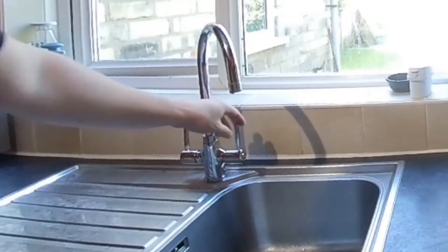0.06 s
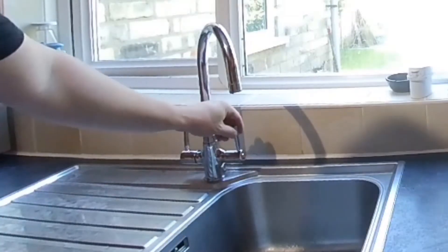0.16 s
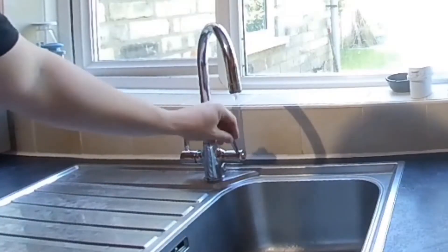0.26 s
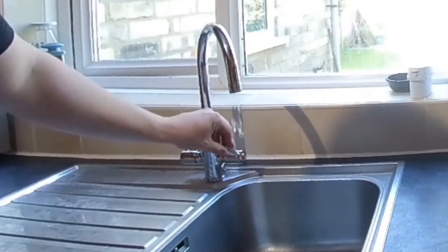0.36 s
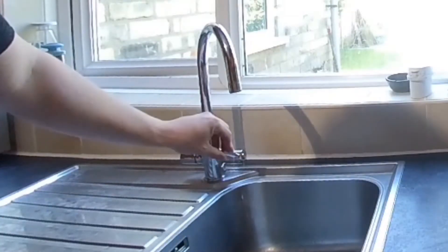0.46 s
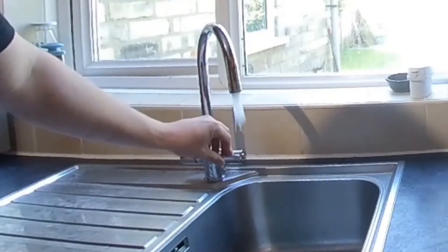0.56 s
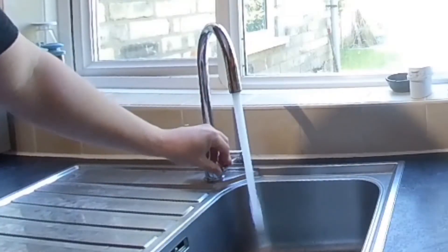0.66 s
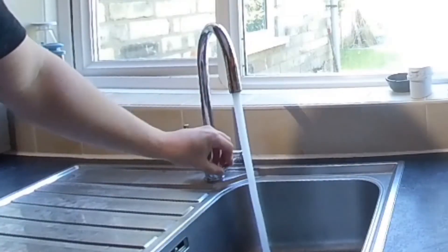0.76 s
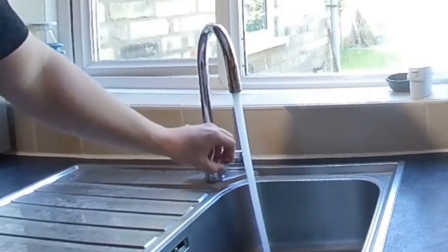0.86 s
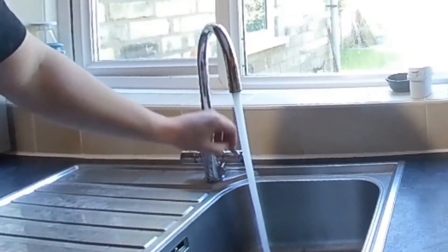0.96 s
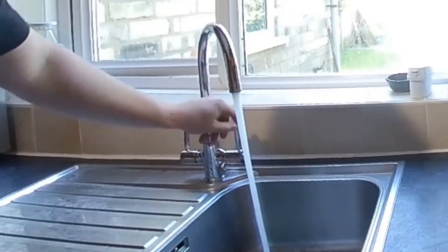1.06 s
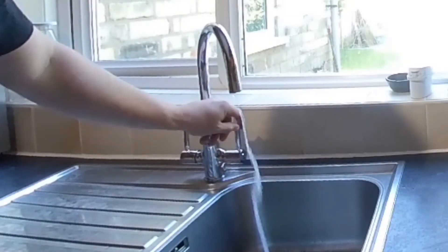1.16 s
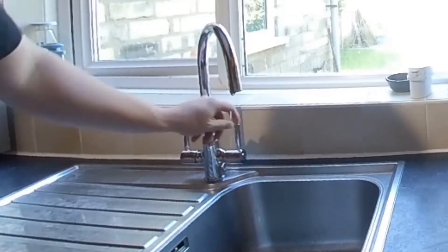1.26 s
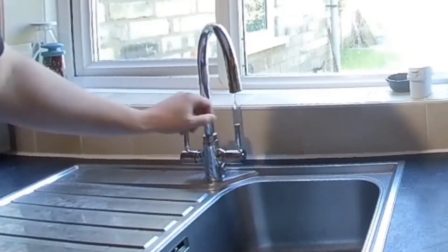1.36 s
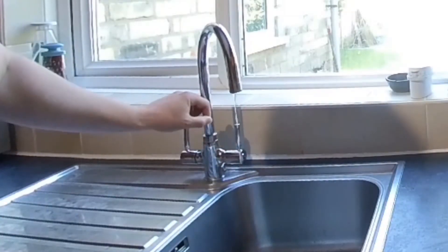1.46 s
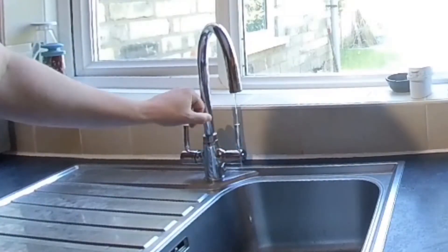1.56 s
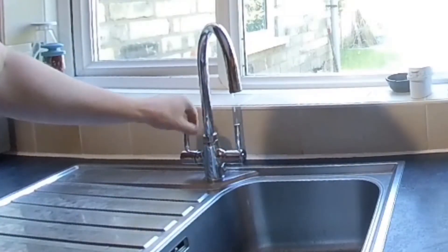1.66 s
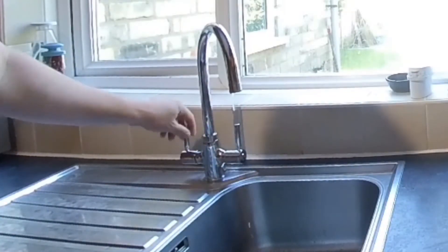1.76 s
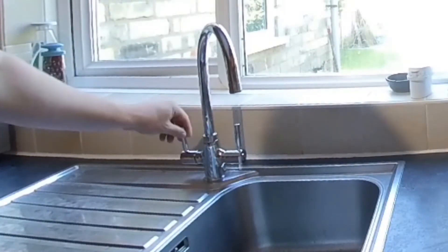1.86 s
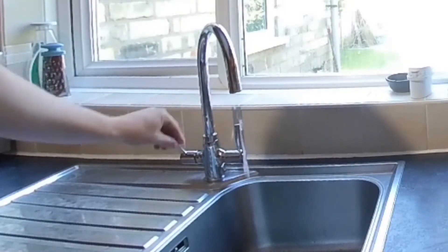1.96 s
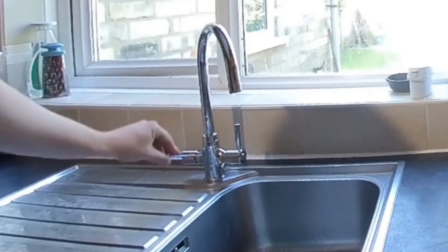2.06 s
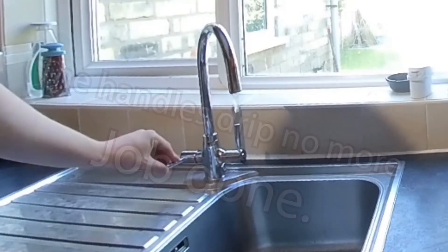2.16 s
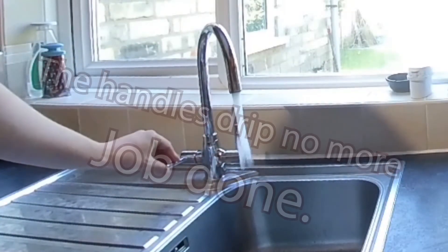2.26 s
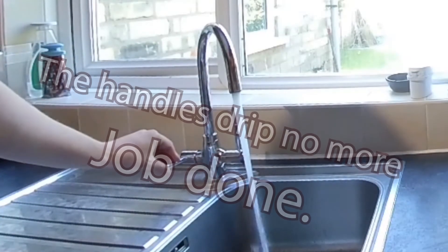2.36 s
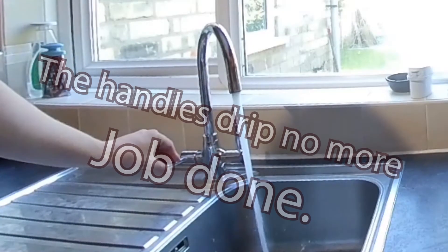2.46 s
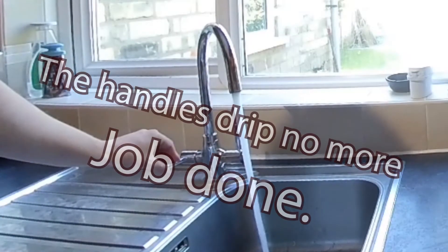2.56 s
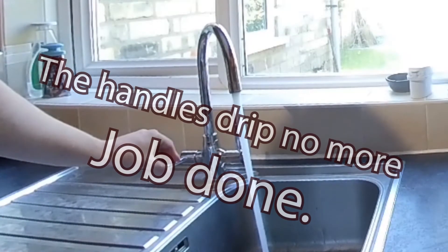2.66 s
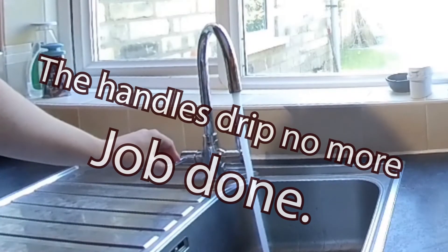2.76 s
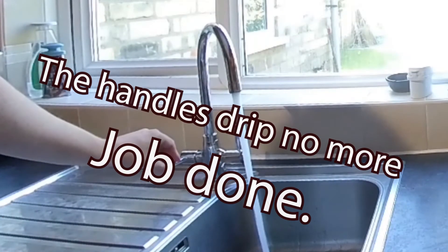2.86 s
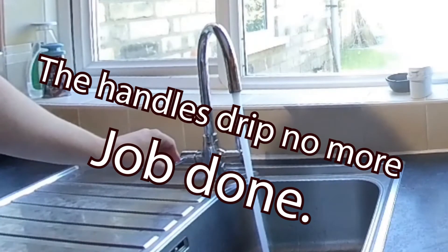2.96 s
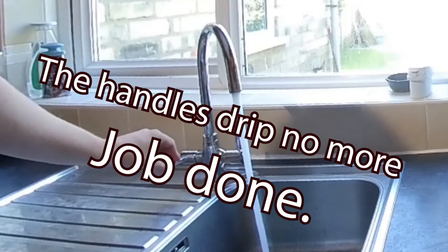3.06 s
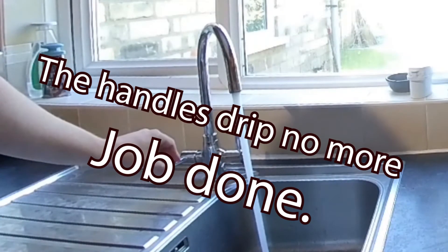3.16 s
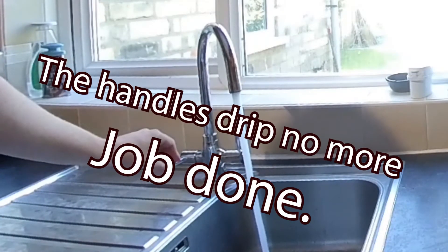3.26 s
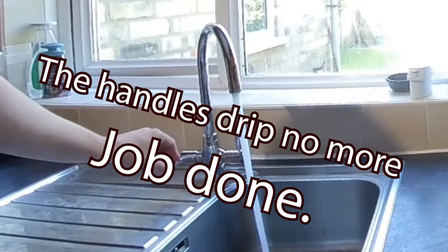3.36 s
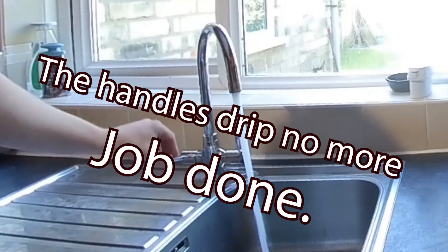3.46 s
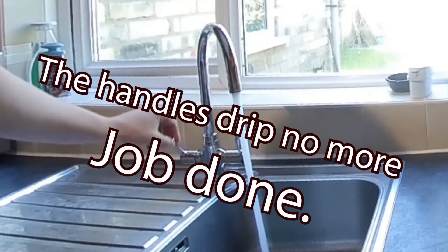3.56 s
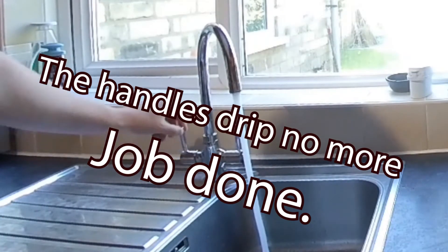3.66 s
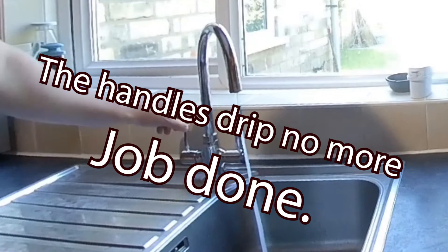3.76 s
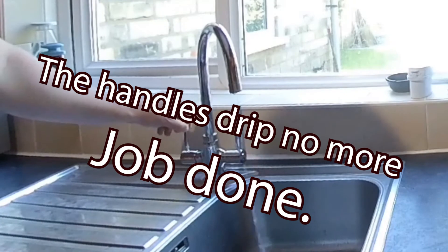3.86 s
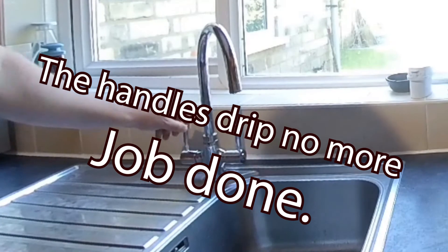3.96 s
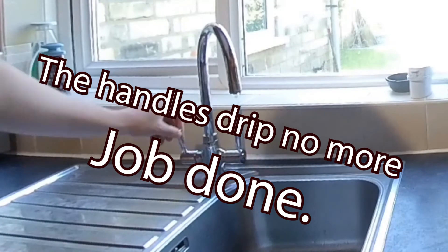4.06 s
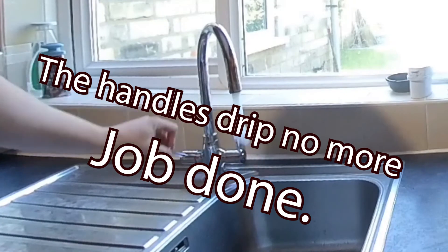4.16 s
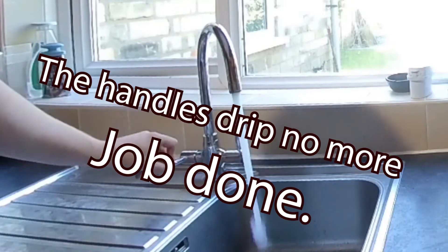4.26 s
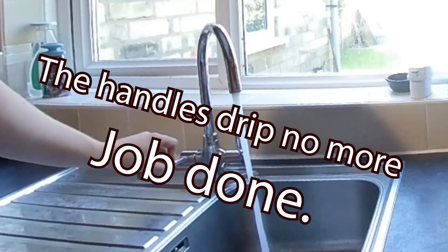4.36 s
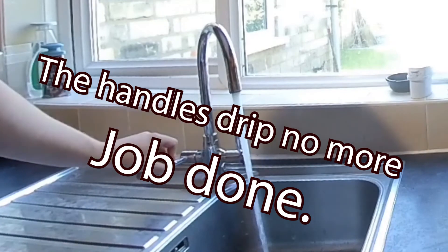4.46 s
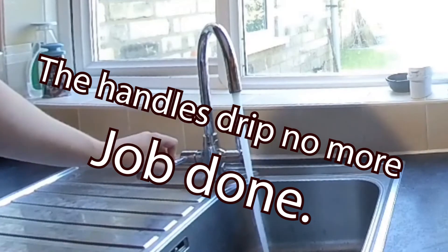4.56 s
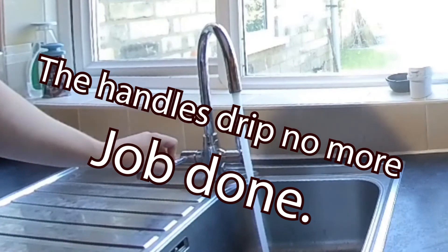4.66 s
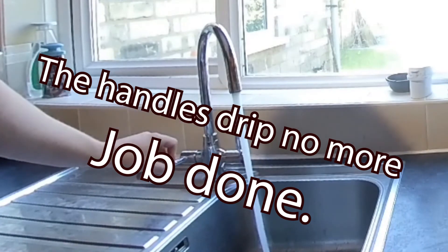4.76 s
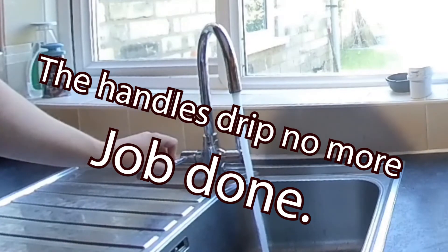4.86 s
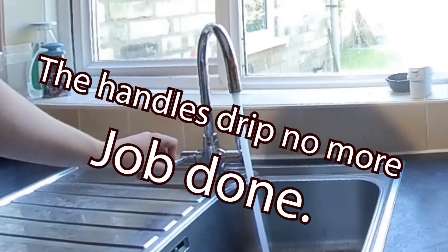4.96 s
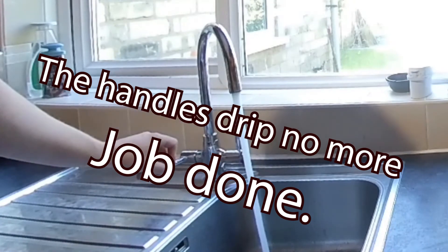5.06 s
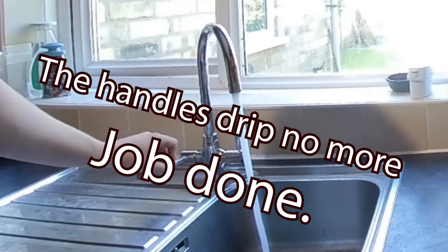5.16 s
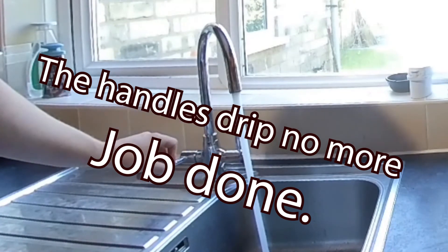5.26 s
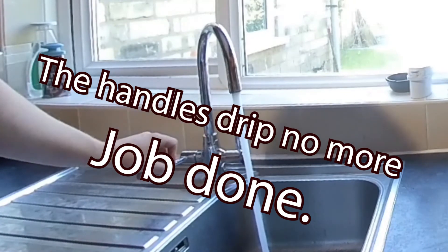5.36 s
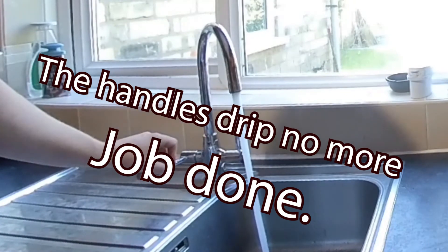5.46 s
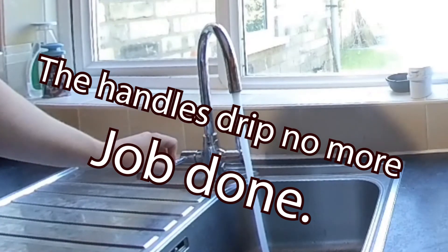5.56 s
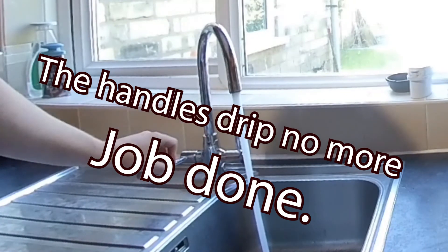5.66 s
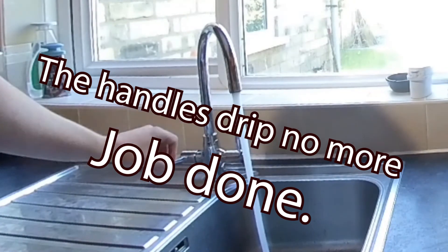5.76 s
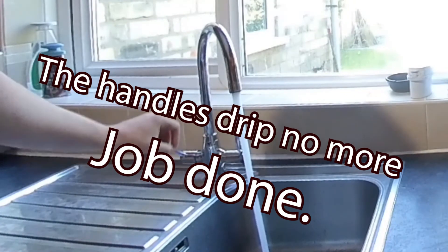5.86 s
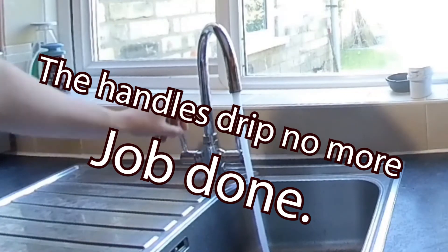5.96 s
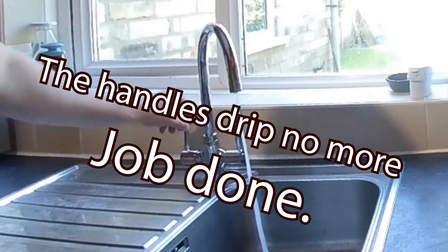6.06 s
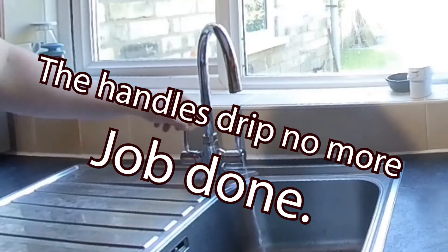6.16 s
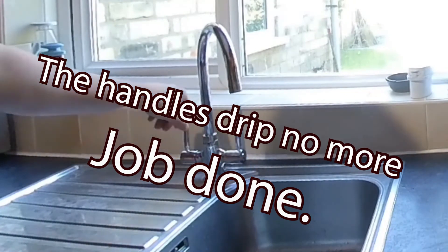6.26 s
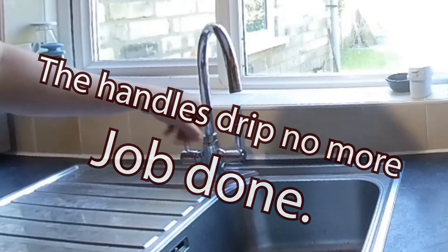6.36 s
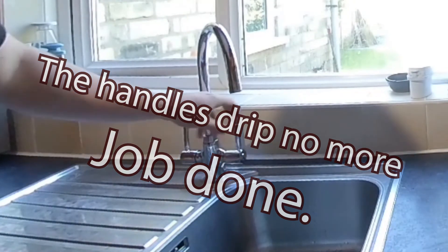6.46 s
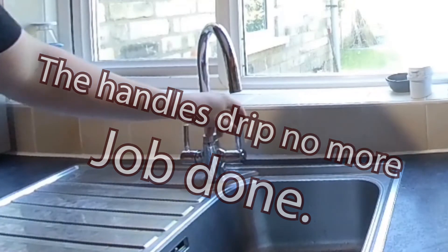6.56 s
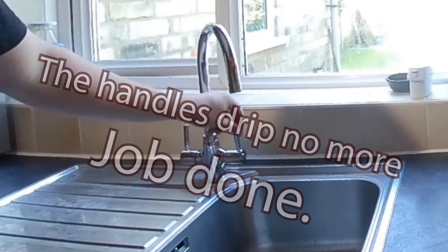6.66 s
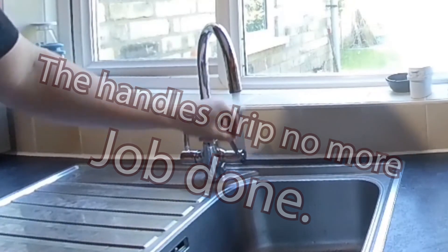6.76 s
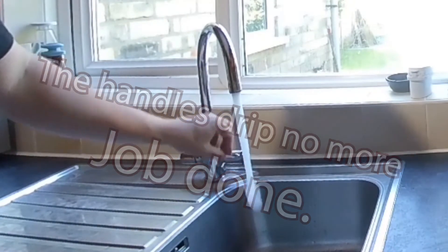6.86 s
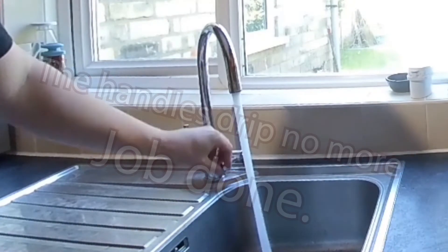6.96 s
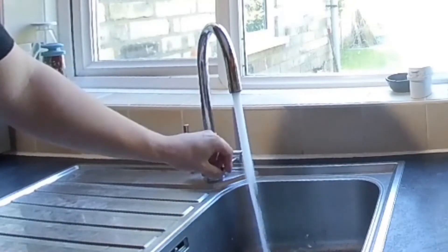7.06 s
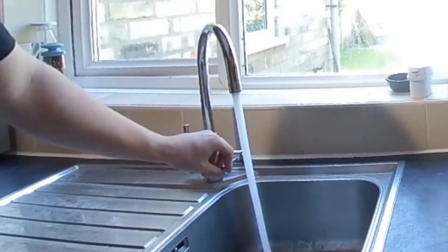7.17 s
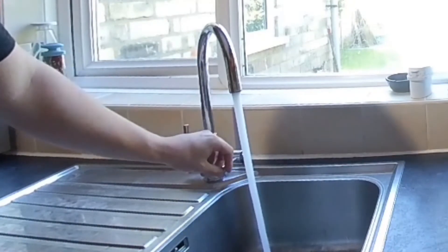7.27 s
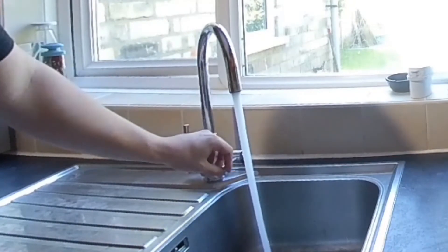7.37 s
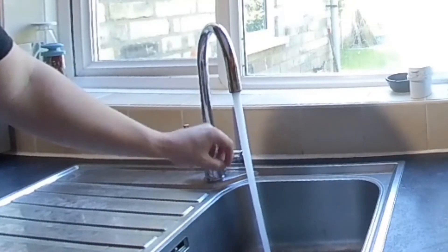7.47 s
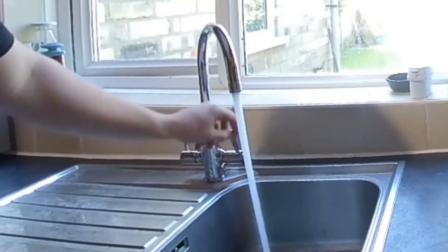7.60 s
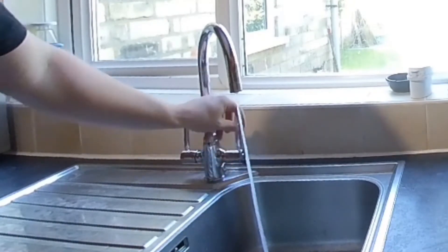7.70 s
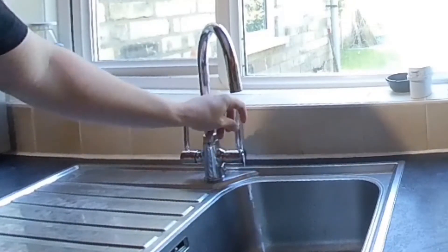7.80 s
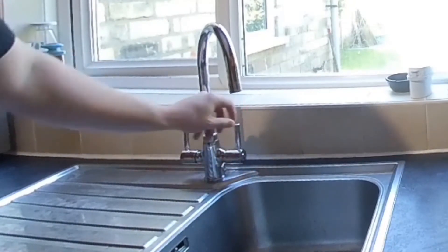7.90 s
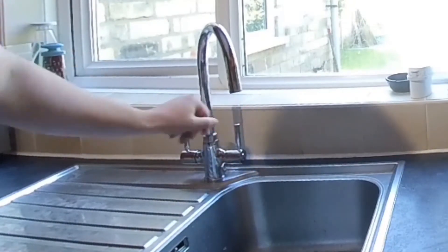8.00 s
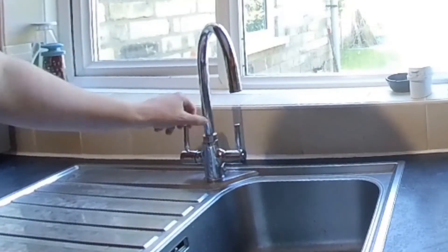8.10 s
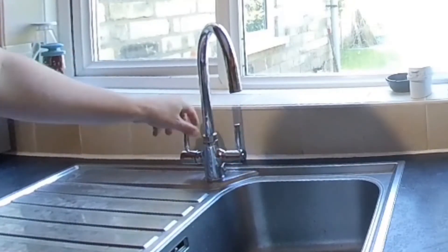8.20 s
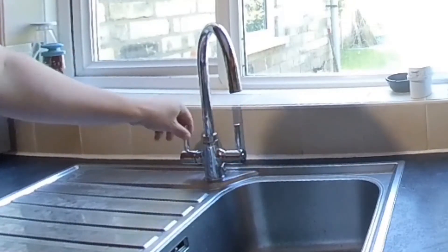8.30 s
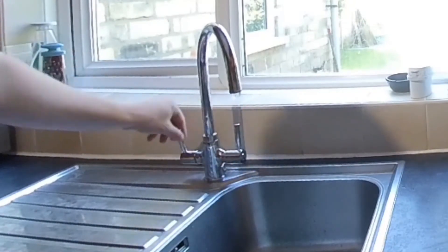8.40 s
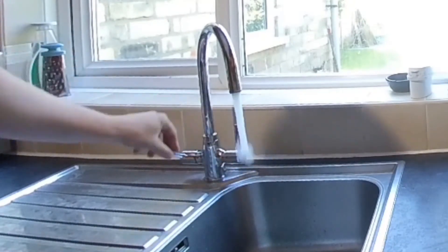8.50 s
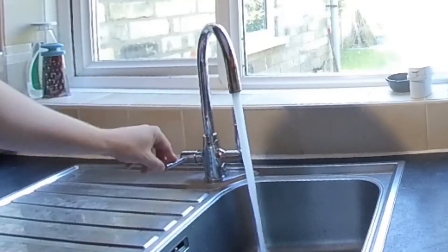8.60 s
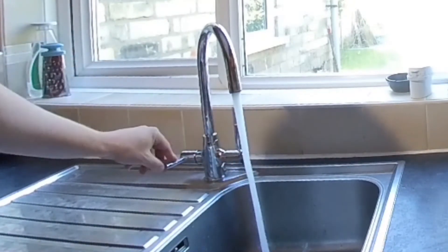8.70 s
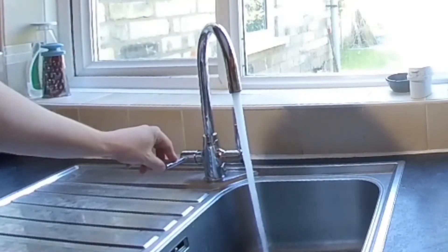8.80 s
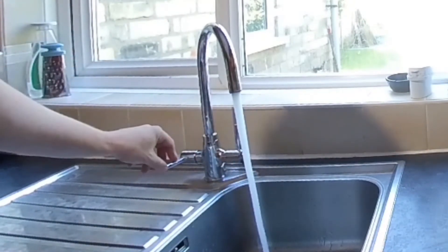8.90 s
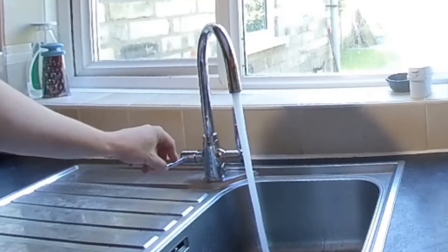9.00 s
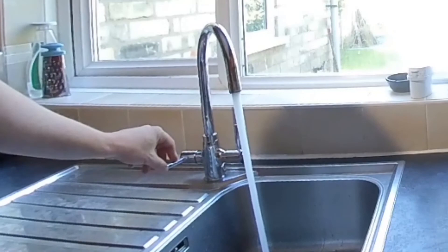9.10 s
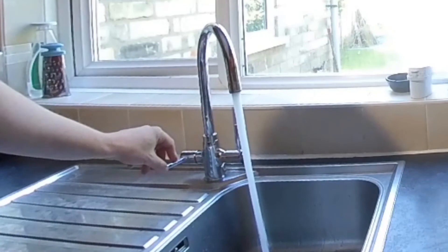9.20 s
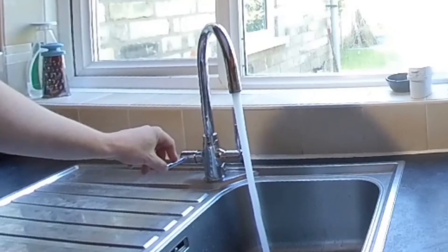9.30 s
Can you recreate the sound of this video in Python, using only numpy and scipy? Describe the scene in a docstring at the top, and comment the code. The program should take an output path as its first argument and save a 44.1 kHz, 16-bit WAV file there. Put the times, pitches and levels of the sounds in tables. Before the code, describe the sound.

Close by in a quiet, slightly ringing kitchen, a tap lever knocks dully, the spout spits, and a jet of water splashes into a steel basin with a bright hiss and a faint low rumble. It is shut off and reopened four times, leaving drips and small spatters in each gap. The drain gurgles briefly after the third run, and the water is still running at the end.

```python
"""Water hisses and drums into a steel kitchen sink, stopped and started by the levers of a mixer tap.
The barely open valve and the fine spray hiss, trapped air fizzes, and the jet rings the basin's modes
and rumbles in the cupboard below. The spout spits, slugs of water slap the steel, levers knock,
drips plink as they trap bubbles, the drain gurgles once, and the tiled kitchen rings briefly."""
import sys
import numpy as np
from scipy import signal
from scipy.fft import rfft, irfft, next_fast_len
from scipy.io import wavfile
from scipy.ndimage import uniform_filter1d

SR = 44100
rng = np.random.default_rng(int(sys.argv[2]) if len(sys.argv) > 2 else 0)


def log_audio(samples):
    """Write samples as a 16-bit WAV file to the path given in sys.argv[1]."""
    # one column per channel
    frames = np.atleast_2d(samples).T
    # limit to full scale, then quantise
    limited = np.clip(frames, -1, 1)
    pcm = np.round(limited * 32767).astype(np.int16)
    wavfile.write(sys.argv[1], SR, pcm)


N = 411894
N_FFT = next_fast_len(N + SR)
TIME_S = np.arange(N) / SR
FREQ_HZ = np.maximum(np.arange(N_FFT // 2 + 1) * SR / N_FFT, 1)

# room tone spectrum: freq_hz, density_db
ROOM_SPECTRUM = [(18, -60), (30, -16), (81, -10.5), (292, -18), (333, -12), (400, -14.5), (711, -21),
                 (770, -9.5), (832, -14), (1830, -25), (15600, -32)]
# drips at the drain: start_s, level_db, pitch_hz
DRAIN_DRIPS = [(0.362, -43, 1403), (0.422, -41, 850), (0.525, -42, 620), (0.548, -41.5, 480),
               (1.944, -38, 522), (0.722, -22, 3600), (0.735, -30, 3000), (0.738, -29, 4520),
               (4.454, -22, 1774), (4.461, -22, 3000), (1.426, -33, 2900), (1.44, -38, 1420),
               (1.475, -47, 1440), (1.502, -39, 2750), (1.613, -44, 1600), (6.518, -45, 1135),
               (6.681, -46, 1070), (6.766, -43, 1110), (6.89, -37, 2180), (6.905, -38, 3250),
               (6.931, -37, 1420), (8.03, -45, 1400), (8.18, -44.5, 1610), (8.292, -50, 438),
               (8.575, -40, 1710), (2.03, -43, 1630), (2.078, -27, 1360), (2.333, -26.5, 1386),
               (6.695, -45, 2310), (6.748, -45, 2330), (6.812, -35.5, 1560), (8.28, -51, 1650),
               (1.584, -41, 883), (1.614, -33, 1005), (1.647, -39, 1030), (1.717, -44, 1075),
               (1.74, -41, 600), (4.219, -41, 1035), (2.718, -23, 4750), (4.769, -30, 1085),
               (4.814, -28, 1070), (6.469, -37, 1960), (6.537, -46, 1500), (6.592, -41, 1450),
               (6.622, -42, 2150), (6.829, -45, 594), (6.953, -35, 1390), (8.089, -44, 1560),
               (8.152, -45, 1517), (8.439, -46, 1690), (8.553, -36, 1370)]
# single drops on the steel: start_s, level_db, centre_hz, t60_s
STEEL_DROPS = [(0.359, -42, 3900, 0.06), (0.686, -20, 3500, 0.015), (1.708, -40, 2750, 0.1),
               (1.718, -42, 5200, 0.26), (1.775, -46, 7000, 0.12), (1.826, -46, 2940, 0.17),
               (3.878, -20, 7000, 0.015), (3.89, -17, 6500, 0.03), (3.931, -20, 6300, 0.02),
               (3.947, -22, 7000, 0.015), (3.986, -18, 7500, 0.04), (4.0, -20, 7800, 0.04),
               (4.03, -24, 7500, 0.015), (4.046, -28, 6500, 0.02), (4.075, -32, 6500, 0.02),
               (4.091, -28, 7300, 0.03), (4.645, -20, 6000, 0.02), (4.661, -17, 7500, 0.02),
               (6.258, -23, 10000, 0.02), (6.318, -25, 8500, 0.03), (6.331, -24, 10500, 0.05),
               (6.412, -16, 7250, 0.033), (6.42, -26, 7500, 0.2), (6.668, -44, 5000, 0.11),
               (7.949, -24, 8500, 0.02), (7.975, -22, 7000, 0.03), (7.995, -30, 9500, 0.02),
               (8.371, -44, 6200, 0.072)]
# levers reaching their stops: start_s, level_db, t60_s
LEVER_KNOCKS = [(0.422, -43, 0.25), (0.792, -31.5, 0.45), (1.236, -36, 0.11), (1.736, -40.5, 0.31),
                (1.941, -42, 0.11), (2.258, -24.5, 0.21), (2.279, -33, 0.16), (2.517, -34, 0.14),
                (3.879, -36, 0.21), (4.384, -27, 0.18), (4.398, -32, 0.23), (6.2, -37, 0.27),
                (6.808, -35.5, 0.14), (7.087, -40, 0.13), (7.839, -28.5, 0.12), (8.286, -48, 0.13),
                (8.711, -23.5, 0.24)]
# tap body modes: freq_hz, gain_db, t60_s
TAP_MODES = [(111, -16, 0.14), (186.4, -2, 0.13), (277, -3.5, 0.088), (446, -5.5, 0.086), (600, -9, 0.15)]
# valve hiss ahead of each jet: start_s, level_db
VALVE_HISSES = [(0.63, -41.5), (2.3, -42), (4.3, -44), (6.875, -43), (8.55, -46)]
# resonances of cupboard, spout tube and basin: freq_hz, width_hz, gain_db
CUPBOARD_MODES = [(85, 15, -4), (107, 18, -2.5), (138, 71, -10), (189, 28, 3), (223, 62, -7.5),
                  (271.4, 12, 5), (384, 21, -7.5), (446, 26, 1.5)]
SPOUT_MODES = [(6760, 270, 3), (8700, 350, 4), (10200, 500, -6), (12000, 600, -1)]
BASIN_MODES = [(600, 41.5, 1), (668, 12.6, 4.5), (812, 18, -5), (920, 88, 5), (1062, 136, -5.5),
               (1237, 58, 5), (1380, 48, 4.5), (1530, 72, 4.5), (1636, 61, -1), (1829, 50, 7),
               (2262, 30, 2.5), (2504, 60, 5.5), (2704, 28, -3.5), (2913, 31, 7.5), (3000, 41, -0.5),
               (3142, 110, 6), (3514, 54, 2.5), (3576, 107, 1.5)]
# spectra of fine spray and broad splash: freq_hz, density_db
SPRAY_SPECTRUM = [(2060, -22.5), (3500, -14), (4300, -6.5), (5260, -4), (7510, 1), (8670, -2), (11400, -1),
                  (12500, -0.5), (15100, 0), (15600, -0.5)]
SPLASH_SPECTRUM = [(250, -11.5), (500, 1.5), (1000, 2.5), (1700, 5.5), (2000, 6.5), (3000, 6), (4200, -1.5),
                   (6000, -5.5), (12000, -11.5)]
# spray bands that flicker separately: centre_hz
FLICKER_BANDS_HZ = [4000, 5600, 7800, 11000, 15000]
# air and water spat out: start_s, fizz_db, spray_db, splash_db, drum_db, t60_s, length_s, rise_s
SPOUT_SPURTS = [(0.616, -33, -57, -49, -34, 3, 0.07, 0.0051),
                (0.69, -35.5, -55, -45, -38, 1.6, 0.023, 0.011),
                (0.714, -26, -54, -37, -40, 2.3, 0.022, 0.0052),
                (1.994, -36.5, -45, -31, -29.5, 0.25, 0.026, 0.004),
                (2.025, -37, -44, -39, -38, 0.49, 0.07, 0.0065),
                (2.072, -51, -53, -45, -32, 0.3, 0.029, 0.0029),
                (2.203, -39.5, -43, -54, -38, 0.44, 0.055, 0.0048),
                (2.26, -45, -64, -41, -31.5, 0.43, 0.1, 0.0018),
                (2.354, -40, -50, -37.5, -64, 0.57, 0.22, 0.011),
                (4.441, -35, -55, -36, -46, 0.25, 0.015, 0.001),
                (6.37, -46, -55, -72, -54, 0.87, 0.11, 0.002)]
# slugs of water landing: start_s, level_db, spray_rel_db, splash_rel_db, drum_rel_db
SLUGS = [(0.3598, -46, -20, -7.5, 13), (0.42, -51.5, -5, -12, 13), (0.863, -28, -3, 1, 4),
         (0.878, -26, 2, 3, 1), (0.9398, -33, 4.5, 2, -19), (1.1337, -18, 6, -18, -23),
         (1.216, -27, -8, 11.5, -4), (1.229, -37, -8, -3, -11), (1.423, -24, 4, -25, -15),
         (1.439, -46, -10, -1, 18.5), (1.503, -36, -10, -13, -10), (1.706, -45, -12, 2, -3),
         (1.944, -58, -10, -5, 17), (2.005, -34, -26, 9, 14), (2.012, -39, -26, 4, 2),
         (2.076, -36, -20, 3, 18.5), (2.11, -38, -20, 2, 12), (2.309, -24, -22, -3, -1),
         (2.332, -31, -20, -1, -1), (2.367, -33, -24, 5, -7), (2.375, -29, -29, -2, -9),
         (2.518, -17.5, 4, 2, -5.5), (2.5387, -12, -18, 4, -32), (2.555, -16, -10, -1, -27),
         (2.587, -21, -3, -10, -31), (2.616, -26, 3, -12, -25), (2.635, -21.5, 9, -10, -27),
         (2.6725, -16, -15, -6, -26), (2.699, -20, -5, -12, -20), (2.725, -24, -9, -13, -22),
         (3.8895, -34, 7, -16, -2), (3.98, -32, -5, -13, -18), (4.087, -44, 5, -23, 11.5),
         (4.449, -27, -10, 4, -11), (4.46, -22, -20, -8, -24), (4.565, -27, -10, -12, -27),
         (4.645, -21, -6, -12, -30), (4.615, -17.5, -15, -5, -33), (4.662, -24.5, 5, -17, -28),
         (6.318, -32, 7, -21, -13), (6.3709, -30, -4, -22, -8), (6.412, -32, -8, -23, -6),
         (6.814, -45, -23, 11, 12), (6.8738, -46, -4, -3, -5), (7.0952, -25, -7, 8.5, -2),
         (7.289, -23.5, -9, 5, 3), (7.649, -18, -7, -15, -27), (7.718, -15, -2, -18, -23),
         (7.741, -19, -6, -16, -18), (8.1524, -47, -10, -13, 2), (8.282, -51, -2, -13, 13),
         (8.768, -22, 6, -1, -6), (8.941, -11, -8, -17, -32)]
# dribble from lever opening to jet landing, then the shut-off; blows are impacts on the basin:
# open_s, spray_from_db, spray_to_db, blows_from_db, blows_to_db, shut_s
LEVER_OPENINGS = [(0.41, -56, -41, -59, -38, 1.23), (2.0, -64, -48, -56, -42, 3.9),
                  (4.23, -47, -46, -49.5, -41, 6.32), (6.86, -54, -37, -50, -32.5, 7.72),
                  (8.552, -46, -60, -50, -37.5, 14)]
# one curve per jet, landing to last trickle: time_s, spray_db, blows_db
JET_CURVES = [
    [(0.862, -23, -29), (0.968, -21.5, -29), (1.2, -20.5, -25), (1.23, -22, -21.5), (1.358, -25.5, -36),
     (1.456, -35.5, -45), (1.55, -63, -57), (1.68, -61, -61.5), (1.95, -66, -63)],
    [(2.515, -32, -25.5), (2.55, -28, -34.5), (2.62, -28, -30.5), (2.74, -25, -34.5), (3.015, -26.5, -36),
     (3.77, -27, -38.5), (3.93, -30, -43.5), (4.0, -31, -45.5), (4.09, -38.5, -52.5), (4.16, -53, -56)],
    [(4.453, -33, -32), (4.483, -27, -33.5), (4.6, -25, -35), (4.63, -34, -38.5), (4.71, -24.5, -32),
     (4.8, -26.5, -35.5), (6.117, -27.5, -38.5), (6.22, -28.5, -41.5), (6.3, -35, -49.5), (6.44, -39, -55),
     (6.5, -48, -68), (6.59, -71, -54.5), (6.8, -81, -55.5)],
    [(7.08, -27, -22), (7.117, -26, -29.5), (7.145, -19.5, -17.5), (7.2, -20.5, -28.5), (7.27, -22.5, -30),
     (7.41, -23.5, -31), (7.55, -22, -29.5), (7.657, -19, -22.5), (7.837, -25.5, -35.5), (7.96, -33.5, -41),
     (8.065, -45, -56), (8.217, -77, -64.5), (8.5, -63, -57)],
    [(8.765, -31.5, -27.5), (8.81, -29.5, -38.5), (8.84, -24.5, -34), (8.93, -25.5, -36),
     (8.98, -26, -26.5), (9.04, -25.5, -35.5), (9.34, -26.5, -37)],
]
# splash, drumming and rumble against blows: level_at_steady_db, slope_db_per_db
BLOW_LAWS = [(-41.5, 0.7549), (-40, 0.6135), (-62, 0.9)]
# pipe shudder as each jet lands: level_db
LANDING_SHUDDER_DB = [-50, -53, -50.5, -52, -52]

ROOM_TONE_DB, ECHO_DB, ECHO_T60_S = -54.5, -11.5, 0.47
GURGLE_SPAN_S, GURGLE_SPAN_DB, GURGLE_HZ, GURGLE_BUBBLES = (6.55, 6.86), (-52, -43), 1083, 18
HUM_REL_DB, HUM_WIDTH_HZ = -11, 60
DRIP_T60_CYCLES = 165
THUD_REL_DB, PUSH_S = -4, 0.002
VALVE_LOW_HZ, VALVE_SWELL_DB_PER_S, TOP_HZ = 11500, 25, 15720
CREST_DB = 7  # peak over rms of a noise burst
SLAP_T60_S, SLAP_TOP_HZ, CLANG_REL_DB = 0.05, 9050, -8.5
LANDING_T60_S, SHUT_SHUDDER_DB, SHUT_T60_S = 3.4, -48.5, 1.55
IDLE_SPRAY_DB, IDLE_BLOWS_DB, STEADY_BLOWS_DB, JUMP_S = -65, -69, -36, 0.005
THINNING_S, THIN_SPLASH_DB = 0.075, -26
DULL_LAG_S, DULL_DB_PER_S, DULL_MAX_DB = 0.07, 45, 6  # dB per band above the middle one
SPIT_LOW_HZ = 840  # light spits stir the higher drumming notes


def undb(db):
    """Decibels to gain."""
    return 10 ** (np.asarray(db) / 20)


def unit(x):
    """Scale to rms 1."""
    return x / np.sqrt(np.mean(x ** 2))


def colour(points):
    """Gain over frequency through (freq_hz, gain_db) points."""
    hz, db = np.transpose(points)
    return undb(np.interp(np.log(FREQ_HZ), np.log(hz), db))


def ring(modes):
    """Causal response of a body's resonances, neighbours in opposite sign."""
    return sum((-1) ** k * undb(db) * 1j * FREQ_HZ * width / (hz ** 2 - FREQ_HZ ** 2 + 1j * FREQ_HZ * width)
               for k, (hz, width, db) in enumerate(modes))


def lowpass(hz, order):
    """Butterworth low-pass response."""
    return signal.freqs(*signal.butter(order, hz, "low", analog=True), FREQ_HZ)[1]


def highpass(hz, order):
    """Butterworth high-pass response."""
    return signal.freqs(*signal.butter(order, hz, "high", analog=True), FREQ_HZ)[1]


def through(x, response):
    """Filter by a frequency response."""
    return irfft(rfft(x, N_FFT) * response, N_FFT)[:N]


def excite(drive, envelope, response):
    """Shape the drive, then ring a body of unit power gain with it."""
    return through(unit(drive) * envelope, response / np.sqrt(np.mean(np.abs(response) ** 2)))


def walk(rate_hz):
    """Smoothed random steps, rms 1."""
    hold = int(SR / rate_hz)
    steps = np.repeat(rng.standard_normal(N // hold + 1), hold)
    return unit(uniform_filter1d(uniform_filter1d(steps, hold), hold)[:N])


def impulses(starts_s, levels_db):
    """One impulse at each start."""
    return np.bincount((starts_s * SR).astype(int), undb(levels_db), N)


def fades(starts_s, levels_db, t60s_s, rise_s):
    """Sum of envelopes that jump up and die away."""
    out = np.zeros(N)
    for start_s, db, t60_s in np.broadcast(starts_s, levels_db, t60s_s):
        i = int(start_s * SR)
        t = TIME_S[:min(int(t60_s * SR), N - i)]
        out[i:i + len(t)] += undb(db - 60 * t / t60_s) * (1 - np.exp(-t / rise_s))
    return out


def patter(rate_hz, spread_db, tail_s, depth):
    """Uneven droplet impacts over the blur of countless finer ones."""
    hits = (rng.random(N) < rate_hz / SR) * undb(spread_db * np.minimum(rng.exponential(size=N), 3))
    bursts = signal.lfilter([1], [1, -np.exp(-1 / (tail_s * SR))], hits)
    return rng.standard_normal(N) * (1 + depth * unit(bursts))


def bubbles(rate_hz, low_hz, high_hz, decay_cycles, spread_db, samples):
    """Bubbles ring as damped sines of random time, pitch and strength; rms 1."""
    when, pitch, strength = rng.random((int(rate_hz * N / SR), 3)).T
    hz, t = (low_hz * (high_hz / low_hz) ** pitch)[:, None], TIME_S[:samples]
    gain = undb(-spread_db * np.log(np.maximum(strength, .1)))[:, None]
    notes = gain * np.sin(2 * np.pi * hz * t) * np.exp(-t * hz / decay_cycles)
    index = (when * (N - samples)).astype(int)[:, None] + np.arange(samples)
    return unit(np.bincount(index.ravel(), notes.ravel(), N))


def room_tone():
    """Faint, dull noise of wavering level."""
    gain = undb(ROOM_TONE_DB + 2.1 * walk(5.5))
    return gain * unit(through(rng.standard_normal(N), colour(ROOM_SPECTRUM)))


def kitchen_echo(direct):
    """Dense tail off tiles and glass, duller than the direct sound."""
    t = TIME_S[:int(.8 * SR)]
    tail = rng.standard_normal(len(t)) * undb(-60 * t / ECHO_T60_S) * (t > .004)
    tail = signal.lfilter([1], [1, -.3], tail)
    return undb(ECHO_DB) * signal.fftconvolve(direct, tail / np.sqrt(np.sum(tail ** 2)))[:N]


def drain_hum():
    """The drain's air column sounds on between the gurgle's bubbles."""
    swell_db = np.interp(TIME_S, GURGLE_SPAN_S, GURGLE_SPAN_DB, left=-120, right=-120)
    envelope = uniform_filter1d(undb(swell_db + HUM_REL_DB + 3 * walk(30)), size=500)
    return envelope * unit(through(rng.standard_normal(N), ring([(GURGLE_HZ, HUM_WIDTH_HZ, 0)])))


def gurgle():
    """A swelling string of bubbles near one note: rows of start_s, level_db, pitch_hz."""
    late, weak, pitch = rng.random((GURGLE_BUBBLES, 3)).T
    progress = (np.arange(GURGLE_BUBBLES) + late) / GURGLE_BUBBLES
    starts_s = np.interp(progress, (0, 1), GURGLE_SPAN_S)
    levels_db = np.interp(progress, (0, 1), GURGLE_SPAN_DB) - 6 * weak
    return np.transpose([starts_s, levels_db, GURGLE_HZ * (1 + .05 * (pitch - .5))])


def drips():
    """Bubbles trapped by drips and the gurgle; each note rises a little and wobbles as it dies."""
    out = np.zeros(N)
    events = np.concatenate([DRAIN_DRIPS, gurgle()])
    for (start_s, db, hz), (phase, beat) in zip(events, rng.random((len(events), 2))):
        t60_s = DRIP_T60_CYCLES / hz
        i, t = int(start_s * SR), TIME_S[:int(t60_s * SR)]
        wobble = 1 + 0.56 * np.cos(2 * np.pi * (50 + 40 * beat) * t)
        note = np.sin(2 * np.pi * (hz * t * (1 + 0.304 * t) + phase))
        out[i:i + len(t)] += undb(db - 60 * t / t60_s) * (1 - np.exp(-t / 0.0015)) * wobble * note
    return out * undb(2.8 * walk(150))  # surrounding water roughens the notes


def drops():
    """Single drops spatter on the steel, each a narrow-band noise burst."""
    out, t = np.zeros(N), TIME_S[:SR // 4]
    for start_s, db, hz, t60_s in STEEL_DROPS:
        band = signal.butter(2, [hz / 1.15, hz * 1.15], "band", fs=SR, output="sos")
        noise = unit(signal.sosfilt(band, rng.standard_normal(len(t))))
        i = int(start_s * SR)
        out[i:i + len(t)] += undb(db - CREST_DB - 60 * t / t60_s) * noise
    return out


def lever_knocks():
    """A soft push rings the tap body; the lever rattles on and sets the cupboard booming."""
    starts_s, db, t60_s = np.transpose(LEVER_KNOCKS)
    t = TIME_S[:SR // 4]
    thud = sum(undb(mode_db - 60 * t / mode_t60_s) * np.sin(2 * np.pi * hz * t)
               for hz, mode_db, mode_t60_s in TAP_MODES)
    thud *= 1 - np.exp(-t / PUSH_S)
    thuds = signal.fftconvolve(impulses(starts_s, db + THUD_REL_DB), thud)[:N]
    rattle = fades(starts_s, db - 0.5 - CREST_DB, t60_s, rise_s=0.00089)
    body = (ring(CUPBOARD_MODES) + undb(3) * lowpass(380, order=2)) * highpass(103, order=2)
    return thuds + excite(rng.standard_normal(N), rattle, body)


def valve_hiss():
    """Water forced through the barely open valve hisses very high, swelling until the jet lands."""
    envelope = np.zeros(N)
    for (start_s, db), curve in zip(VALVE_HISSES, JET_CURVES):
        t = np.maximum(TIME_S - start_s, 0)
        before_landing = TIME_S < curve[0][0]
        envelope += undb(db + VALVE_SWELL_DB_PER_S * t) * (1 - np.exp(-t / 0.018)) * before_landing
    band = highpass(VALVE_LOW_HZ, order=2) * (FREQ_HZ < TOP_HZ)
    return excite(rng.standard_normal(N), envelope * undb(0.65 * walk(14)), band)


def spurt_envelopes():
    """Ragged spitting as fizz, spray, splash and drum gains; a spurt breaks off when its air is out."""
    out = np.zeros((4, N))
    for start_s, *levels_db, t60_s, length_s, rise_s in SPOUT_SPURTS:
        t = np.maximum(TIME_S - start_s, 0)
        shape = (1 - np.exp(-t / rise_s)) * undb(-60 * t / t60_s - 410 * np.maximum(t - length_s, 0))
        out += undb(levels_db)[:, None] * shape
    return out * undb([2.0 * walk(45.45) for _ in out])


def slap_envelope(rel_db):
    """Slugs land: sudden contact, then a spreading sheet of water that dies away."""
    starts_s, db = np.transpose(SLUGS)[:2]
    return fades(starts_s, db + rel_db - CREST_DB, SLAP_T60_S, rise_s=.0004)


def slug_clangs():
    """Each slug's first contact rings the basin's modes in three registers."""
    starts_s, db, _, splash_rel_db, drum_rel_db = np.transpose(SLUGS)
    registers = ((0, highpass(3250, order=6)),
                 (splash_rel_db, highpass(1570, order=6) * lowpass(3250, order=6)),
                 (drum_rel_db, lowpass(1570, order=6)))
    out = np.zeros(N)
    for rel_db, band in registers:
        response = ring(BASIN_MODES) * band
        contacts = impulses(starts_s, db + rel_db + CLANG_REL_DB)
        out += through(contacts, response) / np.max(np.abs(irfft(response)))
    return out


def jet_controls():
    """Per sample: spray_db, blows_db and time since the lever shut (0 while open)."""
    rows, since_shut_s = [(0, IDLE_SPRAY_DB, IDLE_BLOWS_DB)], np.zeros(N)
    for opening, curve in zip(LEVER_OPENINGS, JET_CURVES):
        open_s, spray_from_db, spray_to_db, blows_from_db, blows_to_db, shut_s = opening
        rows += [(open_s - JUMP_S, *rows[-1][1:]), (open_s, spray_from_db, blows_from_db),
                 (curve[0][0] - JUMP_S, spray_to_db, blows_to_db), *curve]
        since_shut_s = np.where(TIME_S < open_s, since_shut_s, np.maximum(TIME_S - shut_s, 0))
    times_s, spray_db, blows_db = np.transpose(rows)
    times_s = np.maximum.accumulate(times_s)
    return np.interp(TIME_S, times_s, spray_db), np.interp(TIME_S, times_s, blows_db), since_shut_s


def cupboard_rumble(rumble):
    """The cupboard booms under the jet; pipes shudder when it lands and when the valve shuts."""
    landings_s = [curve[0][0] for curve in JET_CURVES]
    shuts_s = [opening[-1] for opening in LEVER_OPENINGS[:-1]]
    shudder = fades(landings_s, LANDING_SHUDDER_DB, LANDING_T60_S, rise_s=0.0053)
    shudder += fades(shuts_s, SHUT_SHUDDER_DB, SHUT_T60_S, rise_s=0.025)
    envelope = (rumble + shudder) * undb(2.5 * walk(5))
    return excite(rng.standard_normal(N), envelope, ring(CUPBOARD_MODES))


def film_bubbles(fizz, drum, blows, thinning):
    """Large bubbles plink in the draining film; a shut jet trickles away in tiny bright ones."""
    large = bubbles(110, low_hz=995, high_hz=4150, decay_cycles=9.4, spread_db=2.9, samples=1200)
    tiny = bubbles(90, low_hz=1935, high_hz=7530, decay_cycles=25, spread_db=3.2, samples=600)
    return undb(-8 - 17 * thinning) * np.sqrt(fizz * drum) * large + undb(-8) * thinning * blows * tiny


def spray(flow, slap, since_shut_s, thinning):
    """Fine droplets hiss in flickering bands, bubbles glint; a shut jet dulls and breaks into pings."""
    mist = unit(patter(400, spread_db=1.3, tail_s=0.0031, depth=0.29))
    spectrum = unit(colour(SPRAY_SPECTRUM))
    dull_db = np.clip(DULL_DB_PER_S * (since_shut_s - DULL_LAG_S), 0, DULL_MAX_DB)
    hiss = np.zeros(N)
    for k, weights in enumerate(np.eye(len(FLICKER_BANDS_HZ))):
        band = np.interp(np.log(FREQ_HZ), np.log(FLICKER_BANDS_HZ), weights)
        band_db = 1.26 * walk(18) - max(k - 2, 0) * dull_db
        hiss += through(mist * flow * undb(band_db), spectrum * band)
    glints = bubbles(700, low_hz=4870, high_hz=14920, decay_cycles=35, spread_db=4.8, samples=300)
    pings = bubbles(110, low_hz=6000, high_hz=11120, decay_cycles=22, spread_db=7.2, samples=600)
    bursts = excite(rng.standard_normal(N), slap, spectrum * lowpass(SLAP_TOP_HZ, order=4))
    return hiss + flow * (undb(-11.5) * glints + undb(-12) * thinning * pings) + bursts


def basin(fizz, splash, drum, spit_drum):
    """Jet, slugs and spits patter on the steel: high fizz, middle splash, low drumming."""
    splash_rel_db, drum_rel_db = np.transpose(SLUGS)[3:]
    steel = ring(BASIN_MODES) + undb(-7.5) * colour(SPLASH_SPECTRUM)
    low, high = lowpass(1654, order=6), highpass(2787, order=10)
    middle = highpass(1654, order=6) * lowpass(2787, order=10)
    registers = ((fizz * undb(1.3 * walk(26)) + slap_envelope(0), high),
                 (splash * undb(0.56 * walk(14)) + slap_envelope(splash_rel_db), middle),
                 (drum * undb(1.76 * walk(9.2)) + slap_envelope(drum_rel_db), low),
                 (spit_drum, low * highpass(SPIT_LOW_HZ, order=2)))
    return sum(excite(patter(200, spread_db=3.8, tail_s=0.0093, depth=0.32), envelope, steel * band)
               for envelope, band in registers)


def water_jet():
    """The jet and its spurts drive the water film, basin, cupboard, spout tube and spray."""
    spray_db, blows_db, since_shut_s = jet_controls()
    thinning = np.minimum(since_shut_s / THINNING_S, 1)
    blows = undb(blows_db)
    splash, drum, rumble = (undb(db + slope * (blows_db - STEADY_BLOWS_DB)) for db, slope in BLOW_LAWS)
    spit_fizz, spit_spray, spit_splash, spit_drum = spurt_envelopes()
    fizz = blows + spit_fizz
    drum += undb(-4.5) * spit_drum
    # a thinning jet stops splashing first
    splash = splash * undb(THIN_SPLASH_DB * thinning) + undb(-14) * thinning * blows + spit_splash
    film = film_bubbles(fizz, drum, blows, thinning)
    surge = undb(0.094 * walk(14))  # the jet breaks into slightly uneven lumps
    steel = basin(fizz * surge, splash * surge, drum * surge, spit_drum)
    boom = cupboard_rumble(rumble + undb(-13.5) * spit_drum)
    spout = excite(rng.standard_normal(N), spit_spray, ring(SPOUT_MODES))
    spray_rel_db = np.transpose(SLUGS)[2]
    slap = slap_envelope(spray_rel_db) + undb(-13) * spit_spray
    return film + steel + boom + spout + spray(undb(spray_db) * surge, slap, since_shut_s, thinning)


def scene():
    """Sink sounds and their echo over room tone, alike in both channels."""
    sink = water_jet() + slug_clangs() + valve_hiss() + lever_knocks() + drips() + drops() + drain_hum()
    return np.tile(sink + kitchen_echo(sink) + room_tone(), (2, 1))


def record(dry):
    """The microphone loses the deep bass; a steep low-pass cuts the top."""
    thin = signal.sosfilt(signal.butter(2, 62., "high", fs=SR, output="sos"), dry)
    return signal.sosfilt(signal.ellip(12, .2, 80, TOP_HZ, fs=SR, output="sos"), thin)


dry = scene()
out = record(dry)
log_audio(out)
```